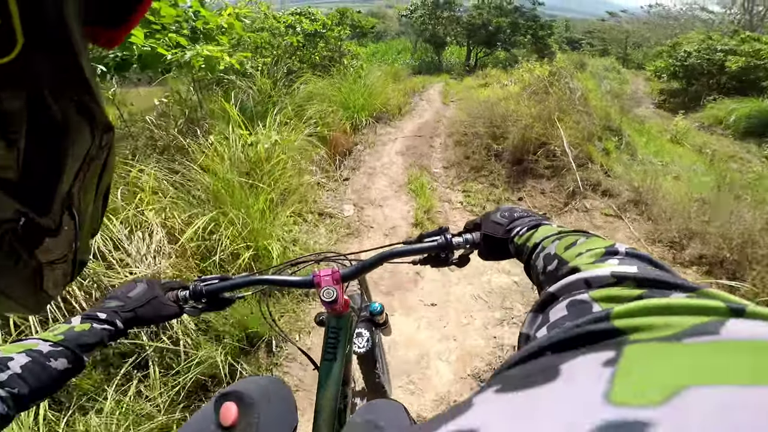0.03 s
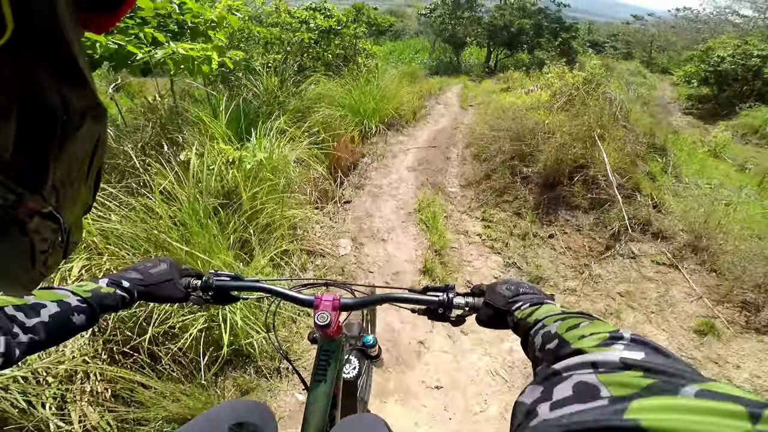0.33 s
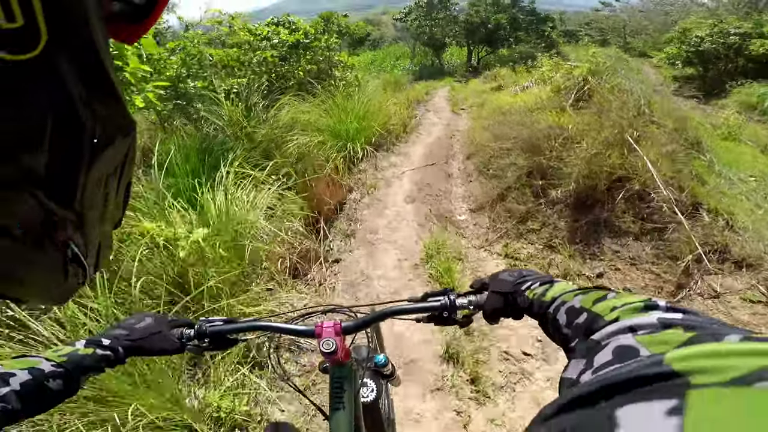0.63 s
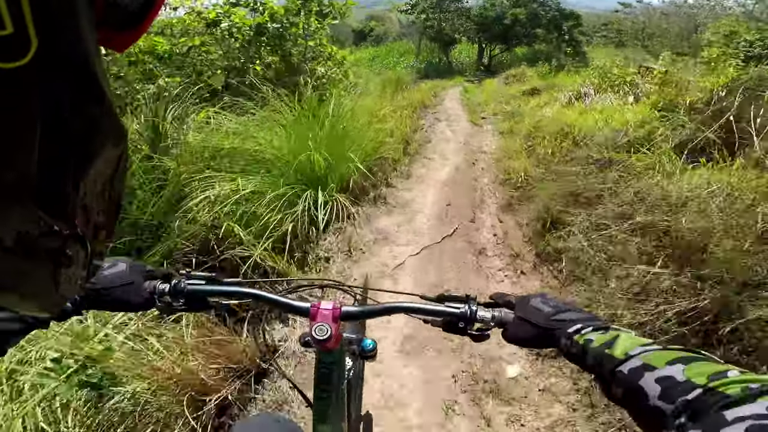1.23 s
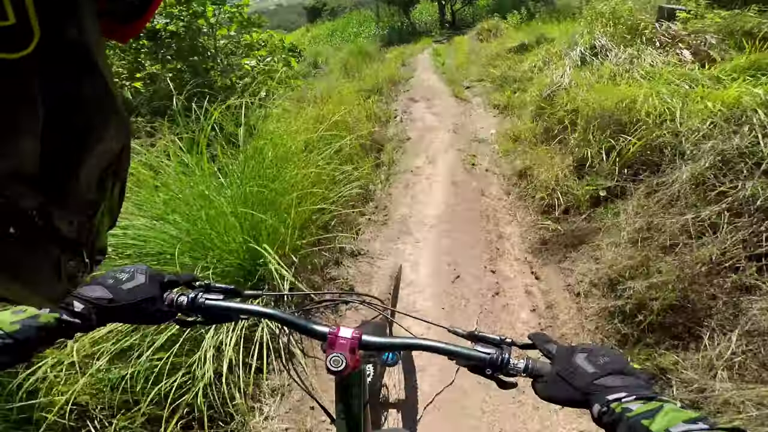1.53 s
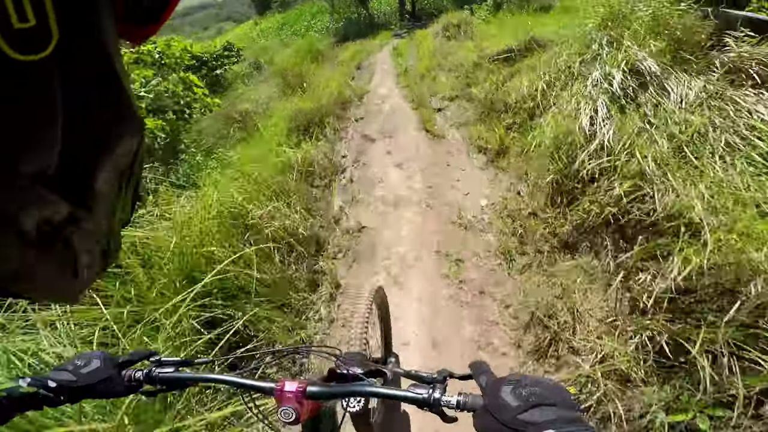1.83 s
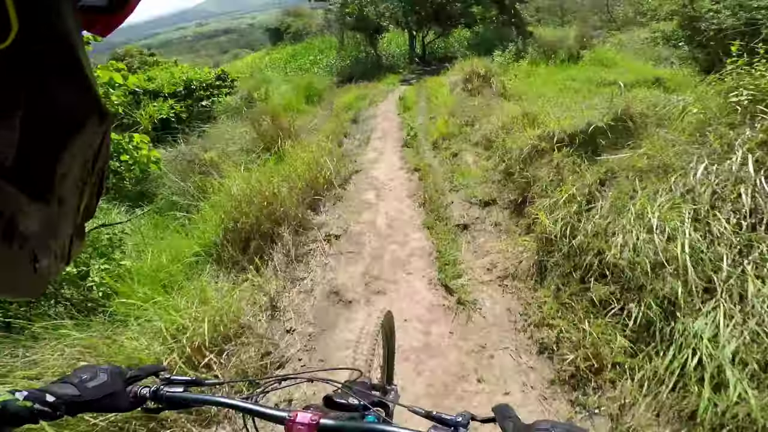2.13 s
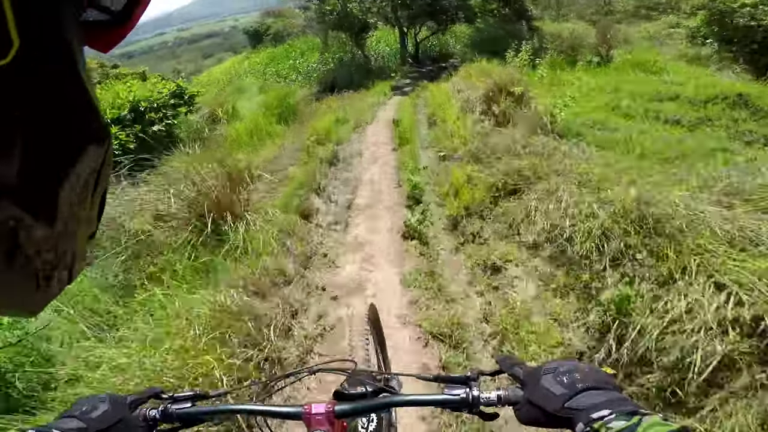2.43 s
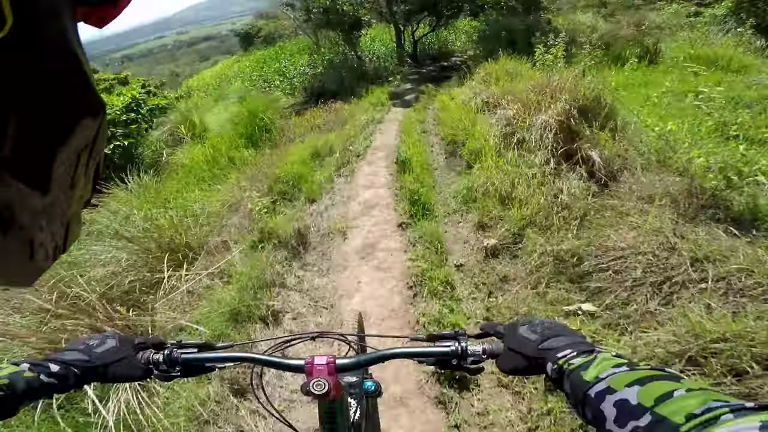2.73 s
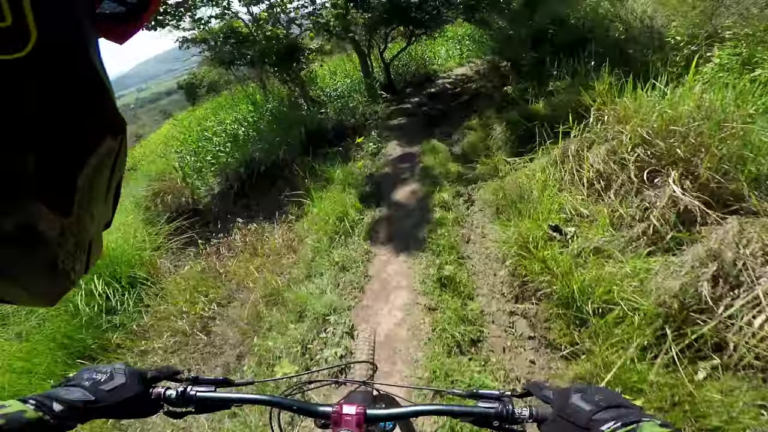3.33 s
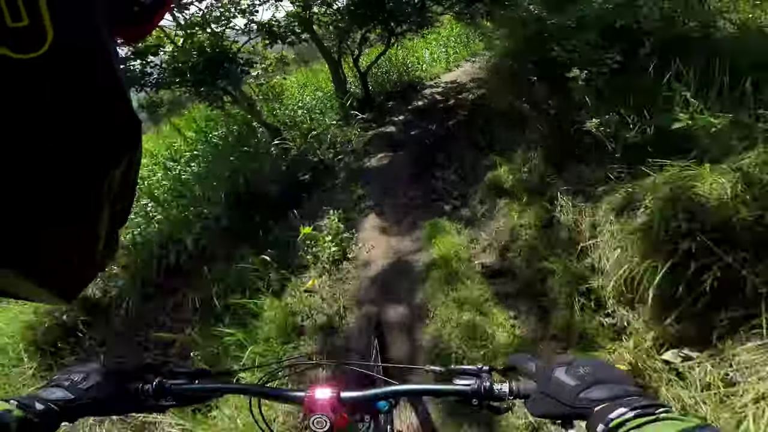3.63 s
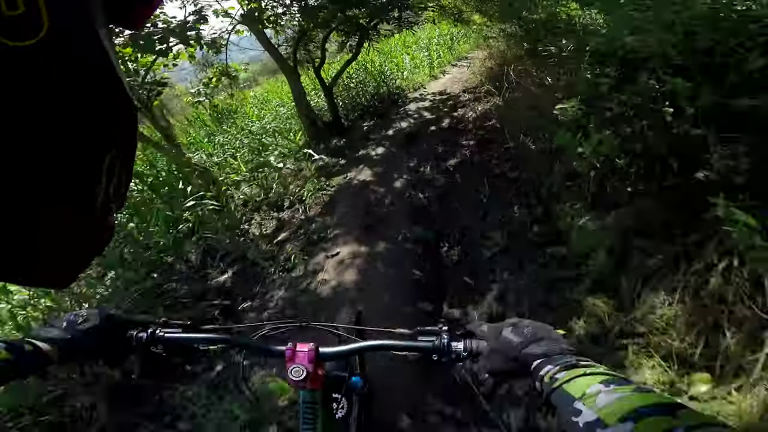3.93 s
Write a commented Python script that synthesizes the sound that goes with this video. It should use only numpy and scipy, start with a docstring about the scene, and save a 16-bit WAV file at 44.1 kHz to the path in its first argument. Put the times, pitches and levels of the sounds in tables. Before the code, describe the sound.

Wind rumbles on a rider's chest microphone as a mountain bike gathers speed down a dirt trail. A faint chain whirr gives way to gusts and crunching tyres, then the chain, cables and frame rattle over rough ground.

```python
"""A mountain bike gathers speed down a dirt trail, heard from a camera on the rider's chest.
At first the chain whirrs on its sprockets, grass brushes past and the tyres crunch softly over grit.
After a second the wind rumble swells and eddies buffet the microphone, while pebbles pop and gravel ticks.
From two seconds the grit hisses louder; from three, rough ground sets chain, cables and frame rattling.
Throughout, the camera's housing dulls the treble of the bike."""
import sys
import numpy as np
from scipy import signal
from scipy.fft import rfft, irfft
from scipy.io import wavfile
from scipy.ndimage import uniform_filter1d

SR = 44100
rng = np.random.default_rng(int(sys.argv[2]) if len(sys.argv) > 2 else 0)


def to_wav(sig):
    """Store sig (one row per channel, or 1-D mono) as 16-bit WAV at the path in sys.argv[1].

    Samples outside -1..1 are clipped; the rate is SR.
    """
    pcm = np.clip(np.atleast_2d(sig), -1, 1) * 32767
    pcm = np.round(pcm).astype(np.int16)
    wavfile.write(sys.argv[1], SR, pcm.T)  # frames by channels


N = 176400

# Envelopes of wind, tyre crunch, hiss of grit and grass, and chain whirr (time [s], level [dB])
WIND_LEVEL = [(0, -28), (.27, -34.5), (.7, -30.5), (.97, -27.5), (1.05, -22), (1.8, -22), (2.0, -16.5),
              (2.1, -17), (2.55, -15.5), (2.75, -12), (2.89, -13), (2.96, -12), (3.55, -11.5), (3.95, -9),
              (4, -11)]
CRUNCH_LEVEL = [(0, -46), (.8, -45), (1.0, -42.5), (1.12, -40.5), (1.27, -43.5), (1.42, -37), (1.6, -42.5),
                (1.86, -39), (1.98, -33.5), (2.6, -34.5), (3.1, -31), (3.22, -25), (3.55, -30), (4, -29)]
HISS_LEVEL = [(0, -48), (.6, -42), (.71, -50), (1.1, -48), (1.5, -46), (1.88, -47.5), (1.95, -44.5),
              (2.09, -30.5), (2.35, -31.5), (2.66, -34.5), (2.88, -31), (3.13, -30.5), (3.36, -24.5),
              (3.6, -30), (3.8, -30), (4, -32)]
WHIRR_LEVEL = [(0, -48), (.42, -48.5), (.95, -61), (1.3, -70)]
# Gusts on the microphone, grass on the bike, sideways tyre slips (time [s], duration [s], level [dB])
BUFFETS = [(1.13, 0.063, -28), (1.714, 0.018, -6.5), (1.821, 0.015, -11.5), (1.855, 0.11, -11),
           (2.608, 0.0066, -8.5), (2.725, 0.025, -14.5)]
SWISHES = [(.004, 0.015, -35.5), (.525, 0.053, -39), (.856, 0.025, -39.5), (1.98, 0.0092, -30),
           (2.327, 0.016, -28), (3.179, 0.012, -17), (3.332, 0.0077, -17.5), (3.402, 0.0047, -17.5),
           (3.487, 0.0097, -20.5)]
SCUFFS = [(.88, 0.026, -46.5), (1.03, 0.11, -44), (1.97, 0.094, -41)]
# Single eddies at the microphone, blunt and sharp (time [s], level [dB])
THUMPS = [(1.184, -15), (1.718, -15), (1.7285, -3), (1.905, -2.5), (1.917, -3), (1.9305, -3), (1.953, -5.5),
          (1.969, -4), (2.6135, -4.5), (2.684, -10), (2.7325, -7.5)]
SNAPS = [(1.8997, -7.5), (1.92, -14), (1.952, -7), (2.613, -19), (2.731, -12)]
# Impacts: chain and cable slaps, frame knocks, flicked pebbles, gravel (time [s], level [dB])
SLAPS = [(1.243, -27.5), (1.549, -22), (1.658, -17.5), (1.667, -24), (2.194, -20.5), (2.426, -16),
         (2.86, -16), (2.999, -16.5), (3.027, -13), (3.181, -10), (3.265, -8.5), (3.292, -13.5),
         (3.362, -9), (3.386, -18), (3.431, -12), (3.487, -10), (3.513, -15), (3.59, -18.5), (3.665, -12.5),
         (3.685, -22), (3.742, -10.5), (3.776, -18), (3.796, -16.5), (3.845, -12), (3.89, -12.5),
         (3.976, -19)]
KNOCKS = [(.853, -26), (3.178, -16), (3.21, -16.5), (3.28, -15.5), (3.335, -19), (3.431, -8.5),
          (3.589, -14), (3.663, -18.5), (3.74, -16.5), (3.818, -17.5), (3.868, -20), (3.89, -15.5)]
PEBBLES = [(.391, -34), (.852, -25.5), (.878, -33), (1.354, -29), (1.904, -26.5), (1.961, -23.5),
           (2.749, -19.5), (2.846, -24), (2.986, -22.5), (3.432, -20), (3.853, -29), (3.976, -24.5)]
GRAVEL = [(1.024, -27.5), (1.397, -22), (1.423, -23.5), (1.658, -22), (1.797, -24.5), (2.194, -13),
          (2.777, -11.5), (2.95, -13), (3.213, -11), (3.687, -13.5), (3.754, -18)]
# Modes of chain and cables, frame, brake disc and sprockets (frequency [Hz], level [dB], T60 [s])
CHAIN_MODES = [(2450, -16, 0.17), (2860, -15.5, 0.045), (3390, -14, 0.059), (3536, -10, 0.043),
               (3670, -7, 0.054), (3930, -3, 0.031), (4345, -2.5, 0.023), (4760, -2.5, 0.03),
               (5400, -4.5, 0.012)]
FRAME_MODES = [(640, -8.5, 0.028), (794, 6, 0.014), (903, 3.5, 0.048), (1140, -9, 0.024), (1370, -6, 0.015)]
DISC_MODES = [(3860, -27, .25), (3970, -18, 0.084)]
SPROCKET_MODES = [(1386, -5.5, 0.025), (1686, -2.5, 0.02), (2340, -3, 0.039), (2824, -5, 0.032),
                  (3900, -7, 0.0083), (3980, 0.5, 0.009), (4700, -5.5, 0.0073)]
# Spectral densities of the noise sources (frequency [Hz], relative level [dB])
WIND_SPECTRUM = [(18, 1), (33, 0.5), (70, -2), (125, -8.5), (220, -17.5), (400, -28), (800, -40),
                 (1600, -67)]
BUFFET_SPECTRUM = [(25, 0.5), (60, 7.5), (110, 6.5), (220, -12.5), (400, -16), (750, -36), (1500, -42),
                   (3000, -71)]
CRUNCH_SPECTRUM = [(150, 3), (400, -0.5), (700, -4.5), (1200, -3.5), (1700, -14), (2300, -15.5),
                   (3200, -27), (5000, -27.5)]
HISS_SPECTRUM = [(700, -33), (1500, 3.5), (2400, 2.5), (3100, 1.5), (4000, -5), (4700, 7), (6300, -1.5),
                 (8000, 6.5), (12000, -16.5)]
PEBBLE_SPECTRUM = [(300, -14.5), (700, -5), (1300, 2), (1900, 6), (2700, -26), (5000, -10)]
SWISH_SPECTRUM = [(900, -7.5), (2000, -8), (3000, -7), (4200, 5.5), (6000, -4.5), (12000, -4)]
SCUFF_SPECTRUM = [(600, -26), (1000, -5), (1400, 11), (1750, -15), (2300, -24)]
MIC_SPECTRUM = [(5000, -19.5), (7200, -5.5), (9000, -4.5), (10500, -2), (11800, -0.5), (14000, -24)]


def wind():
    """Turbulence: pressure fluctuations at the microphone grow and brighten with flow speed."""
    crossover_hz, flutter_db = 71.3, 1.9
    force = envelope(WIND_LEVEL)
    air = steady(shaped_noise(WIND_SPECTRUM, flicker_db=1.8), window_s=0.1)
    deep = butter(air, crossover_hz, "low", order=3)
    upper = butter(air, crossover_hz, "high", order=3) * (force / force.mean()) ** 0.17
    rumble = (deep + upper) * force * from_db(flutter_db * drift(rate_hz=39))
    gusts = steady(shaped_noise(BUFFET_SPECTRUM), window_s=0.022)
    return rumble + thumps() + snaps() + gusts * swells(BUFFETS, attack_s=0.0029, release_s=0.0031)


def thumps():
    """Bipolar pulses: each eddy sucks, then flips steeply to pressure and dies away."""
    edge_s, decay_s = 0.0008, 0.0015
    t = np.arange(-SR // 50, SR // 50) / SR
    pulse = np.tanh(t / edge_s) * np.exp(-np.abs(t) / decay_s)
    return signal.fftconvolve(impulses(THUMPS), pulse / pulse.max(), "same")


def snaps():
    """Pressure transients: the hardest eddies make spikes so brief that their spectrum is broad."""
    rise_s = 0.00032
    age = np.arange(SR // 100) / SR / rise_s
    spikes = signal.fftconvolve(impulses(SNAPS), age * np.exp(1 - age))[:N]
    return butter(spikes, 6000, "low", order=1)


def tyres():
    """Shot noise: countless grain impacts merge into crunch and hiss, while single pebbles pop out."""
    uneven_ground = from_db(1.4 * drift(rate_hz=27))
    crunch = shaped_noise(CRUNCH_SPECTRUM, flicker_db=2.5, source=lambda: grit(per_s=900, share=0.54))
    hiss = shaped_noise(HISS_SPECTRUM, flicker_db=2.9, source=lambda: grit(per_s=2900, share=0.37))
    pops = shaped_noise(PEBBLE_SPECTRUM) * decay(impulses(PEBBLES), decay_s=0.0035)
    return crunch * envelope(CRUNCH_LEVEL) + hiss * envelope(HISS_LEVEL) * uneven_ground + pops


def grit(per_s, share):
    """Poisson process: clicks of uneven size carry a share of the power, smooth noise the rest."""
    spread_db = 8.5
    sizes = from_db(spread_db * np.minimum(rng.exponential(1, N), 4)) * rng.choice([-1, 1], N)
    grains = unit_rms(sizes * arrivals(per_s))
    return np.sqrt(share) * grains + np.sqrt(1 - share) * rng.standard_normal(N)


def chain():
    """Impact excitation: each slap of chain or cable gives a broadband crack and a metallic rattle."""
    blows = impulses(SLAPS)
    contact = crack(blows, band_hz=[2220, 9100], decay_s=0.0043)
    metal = rattle(blows, CHAIN_MODES, decay_s=0.015, contacts_per_s=730)
    return from_db(-0.5) * contact + from_db(-14) * metal


def frame():
    """Free vibration: bumps excite the hollow frame and leave a brake disc ringing faintly."""
    blows = impulses(KNOCKS)
    knocks = rattle(blows, FRAME_MODES, decay_s=0.0068, contacts_per_s=970)
    return from_db(-6.5) * knocks + ring(blows, DISC_MODES)


def gravel():
    """Brief contact: small stones striking the bike radiate thin, high ticks."""
    return crack(impulses(GRAVEL), band_hz=[3700, 8300], decay_s=0.0036)


def grass():
    """Friction noise: blades brush the bike in short, bright swishes."""
    return shaped_noise(SWISH_SPECTRUM) * swells(SWISHES, attack_s=0.0037, release_s=0.0041)


def scuffs():
    """Sliding friction: rubber slips on hard dirt with a soft, narrow-band scrape."""
    return shaped_noise(SCUFF_SPECTRUM) * swells(SCUFFS, attack_s=0.025, release_s=0.035)


def drivetrain():
    """Quasi-periodic forcing: each link meeting a sprocket drives its modes with a burst of noise."""
    links_per_s, jitter_s, floor = 31, 0.0024, 0.17
    link_times = np.arange(0, N / SR, 1 / links_per_s)
    link_times += jitter_s * rng.standard_normal(N)[:len(link_times)]
    bursts = floor + decay(impulses([(s, 0) for s in link_times]), decay_s=0.0041)
    return unit_rms(ring(bursts * rng.standard_normal(N), SPROCKET_MODES)) * envelope(WHIRR_LEVEL)


def chatter():
    """Random excitation: light contacts keep the loose chain jingling, in step with the hiss of grit."""
    contacts = arrivals(per_s=350) * rng.standard_normal(N)
    return from_db(-6) * ring(contacts * envelope(HISS_LEVEL), CHAIN_MODES)


def housing(x):
    """Transmission loss: the camera's shell shuts out the treble, apart from a small leak."""
    corner_hz, steep_hz, leak_db, leak_top_hz = 4506, 6370, -32, 9930
    hz = np.arange(N + 1) * SR / (2 * N)
    shell_power = 1 / (1 + (hz / corner_hz) ** 10) / (1 + (hz / steep_hz) ** 24)
    leak_power = from_db(leak_db) ** 2 / (1 + (hz / leak_top_hz) ** 14)
    return irfft(rfft(x, 2 * N) * np.sqrt(shell_power + leak_power))[:N]


def crack(blows, band_hz, decay_s, attack_s=0.00094):
    """Impact noise: each blow releases a band-limited burst that rises fast and decays."""
    noise = unit_rms(butter(rng.standard_normal(N), band_hz, "band"))
    return noise * (decay(blows, decay_s) - decay(blows, attack_s))


def rattle(blows, modes, decay_s, contacts_per_s):
    """Rebound: each blow and a dying run of loose contacts after it excite the modes."""
    rebounds = decay(blows, decay_s) * arrivals(contacts_per_s) * rng.uniform(-0.94, 1, N)
    return ring(blows + rebounds, modes)


def ring(drive, modes):
    """Modal superposition: damped resonators add, each struck with a random strength of its own."""
    out = np.zeros(N)
    for k, (hz, db, t60) in enumerate(modes):
        radius, angle = from_db(-60 / (t60 * SR)), 2 * np.pi * hz / SR
        force = drive * rng.uniform(0.25, 1.23, N) + 1e-18
        mode = signal.lfilter([0, np.sin(angle)], [1, -2 * radius * np.cos(angle), radius ** 2], force)
        out += (-1) ** k * from_db(db) * mode
    return out


def shaped_noise(spectrum, flicker_db=0, source=None):
    """Spectral shaping: noise or a source is weighted in third-octave bands that may flicker; rms 1."""
    hz, db = np.transpose(spectrum)
    edges = 16 * 2 ** (np.arange(30) / 3)
    feeds = [rng.standard_normal(N) if source is None else source() for _ in range(2)]
    out = np.zeros(N)
    for k, (low, high) in enumerate(zip(edges, edges[1:])):
        centre = np.sqrt(low * high)
        if hz[0] / 2 < centre < hz[-1] * 2:
            feed = feeds[k % 2]  # independent neighbours add in power
            padded = np.concatenate([feed[-SR // 4:], feed])  # lets the filter settle
            band_db = np.interp(np.log(centre), np.log(hz), db)
            flicker = flicker_db * drift(rate_hz=10.9) if flicker_db else 0
            out += from_db(band_db + flicker) * butter(padded, [low, high], "band")[-N:]
    return unit_rms(out)


def drift(rate_hz):
    """Random modulation: low-passed noise of unit rms."""
    step, settle = 40, 2000
    pole = np.exp(-2 * np.pi * rate_hz * step / SR)
    noise = rng.standard_normal(N // step + settle + 2)
    slow = signal.lfilter([1], [1, -2 * pole, pole ** 2], noise)[settle:]
    return np.interp(np.arange(N) / step, np.arange(len(slow)), unit_rms(slow))


def steady(x, window_s):
    """Division by the running rms removes slow swings of level."""
    return x / np.sqrt(uniform_filter1d(x ** 2, int(window_s * SR)) + 1e-9)


def swells(rows, attack_s, release_s):
    """Exponential rise, hold and exponential fall for each (time [s], duration [s], level [dB])."""
    t = np.arange(N) / SR
    return sum(
        from_db(db) * np.exp(np.minimum(t - s, 0) / attack_s - np.maximum(t - s - hold, 0) / release_s)
        for s, hold, db in rows)


def arrivals(per_s):
    """Independent random events at a mean rate."""
    return rng.random(N) < per_s / SR


def impulses(rows):
    """One impulse for each (time [s], level [dB])."""
    times, db = np.transpose(rows)
    return np.bincount(np.clip(times * SR, 0, N - 1).astype(int), from_db(db), N)


def decay(clicks, decay_s):
    """Each impulse starts an exponential decay."""
    return signal.lfilter([1], [1, -np.exp(-1 / (decay_s * SR))], clicks + 1e-18)


def envelope(rows):
    """Gain interpolated through (time [s], level [dB])."""
    return from_db(np.interp(np.arange(N) / SR, *np.transpose(rows)))


def butter(x, hz, kind, order=2):
    """Causal Butterworth filter."""
    sections = signal.butter(order, np.clip(hz, 10, 0.45 * SR), kind, fs=SR, output="sos")
    return signal.sosfilt(sections, x + 1e-18)


def unit_rms(x):
    """Normalisation to unit power."""
    return x / np.sqrt(np.mean(x ** 2) + 1e-20)


def from_db(db):
    """Decibels to amplitude ratio."""
    return 10 ** (np.asarray(db) / 20)


def scene():
    """Superposition: the bike is heard through the housing; the wind strikes the microphone directly."""
    bike = tyres() + gravel() + scuffs() + grass() + drivetrain() + chain() + chatter() + frame()
    return (wind() + housing(bike))[None]


def record(dry):
    """Self-noise, saturation and bandwidth: the microphone hisses, rounds strong peaks and cuts the top."""
    hiss_db, hiss_top_hz, cutoff_hz = -64, 9930, 15700
    noisy = dry + butter(from_db(hiss_db) * shaped_noise(MIC_SPECTRUM), hiss_top_hz, "low", order=7)
    saturated = noisy / (1 + noisy ** 8) ** (1 / 8)
    return butter(saturated, cutoff_hz, "low", order=12)


dry = scene()
out = record(dry)
to_wav(out)
```